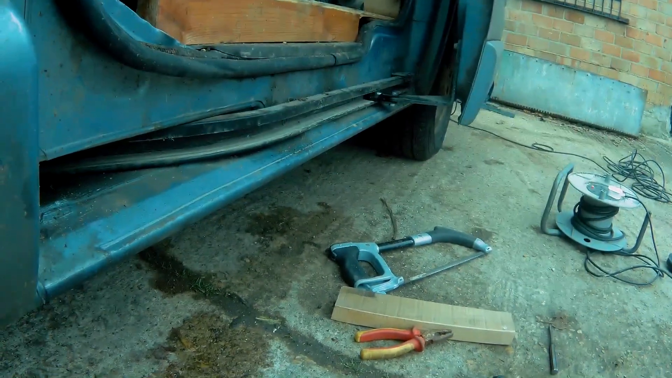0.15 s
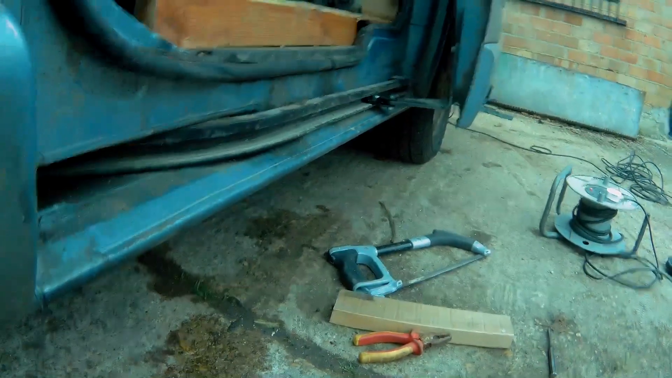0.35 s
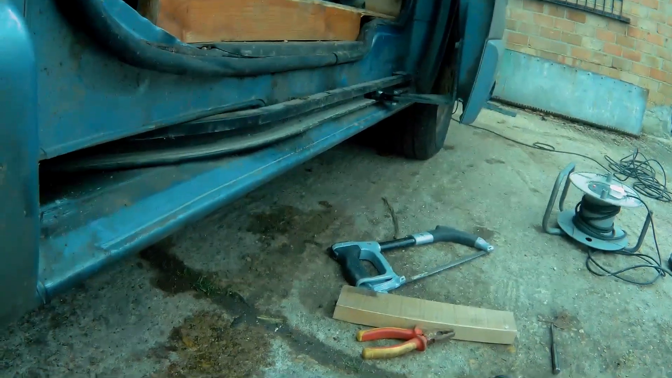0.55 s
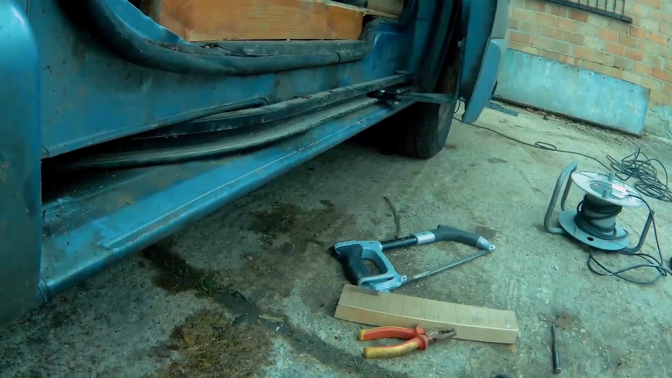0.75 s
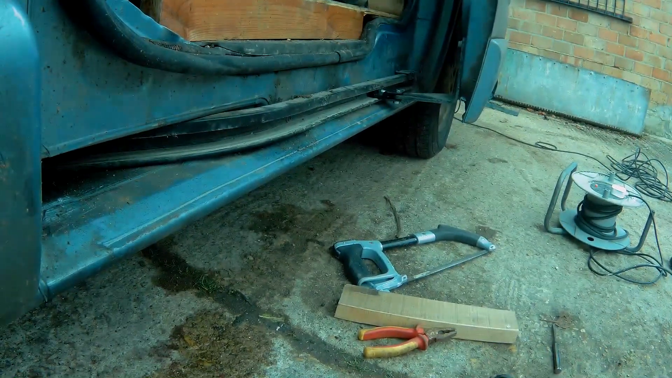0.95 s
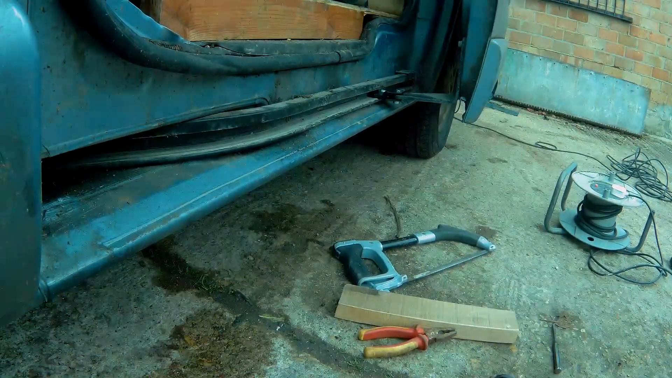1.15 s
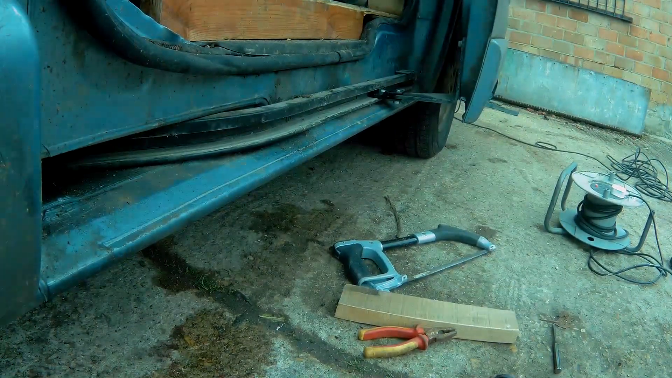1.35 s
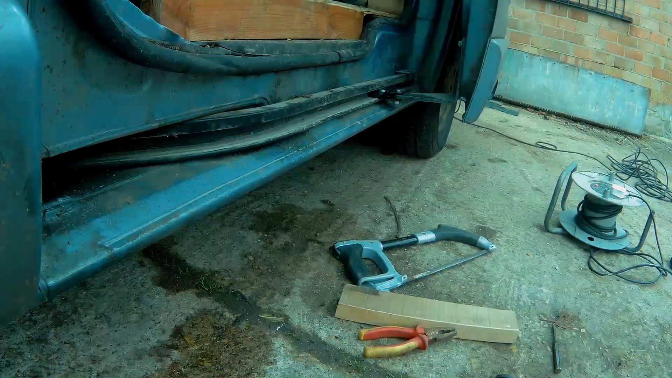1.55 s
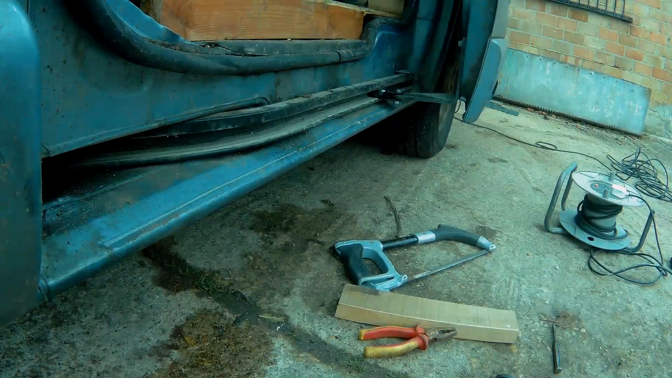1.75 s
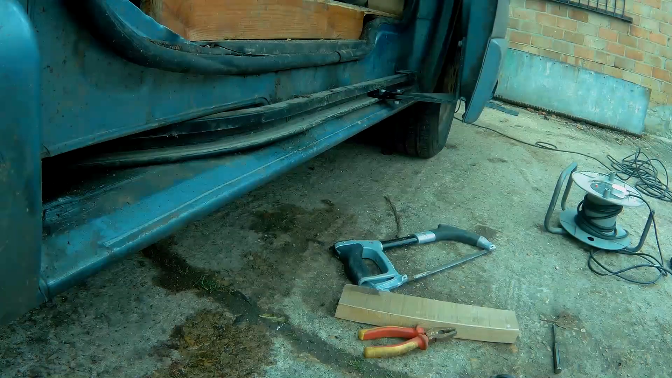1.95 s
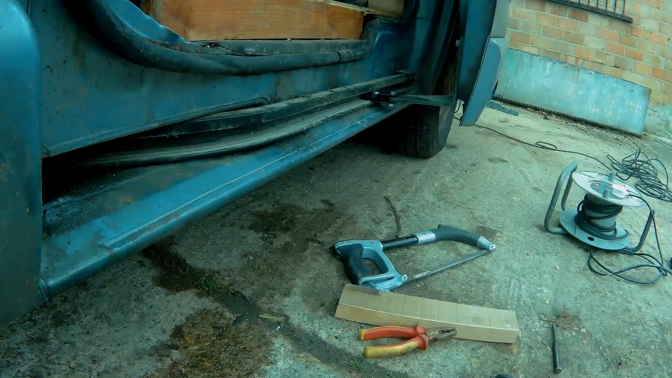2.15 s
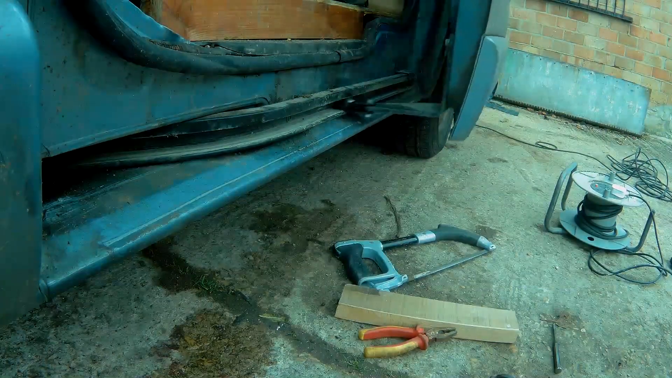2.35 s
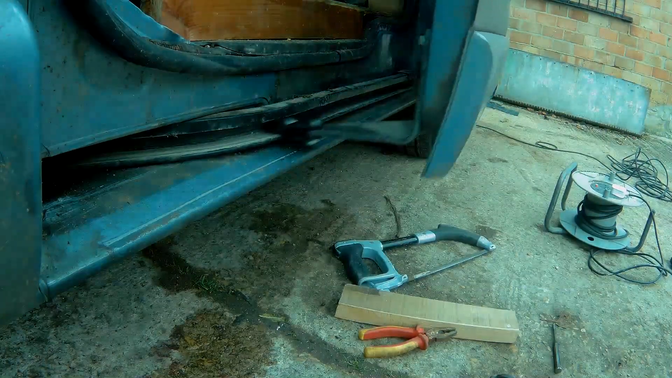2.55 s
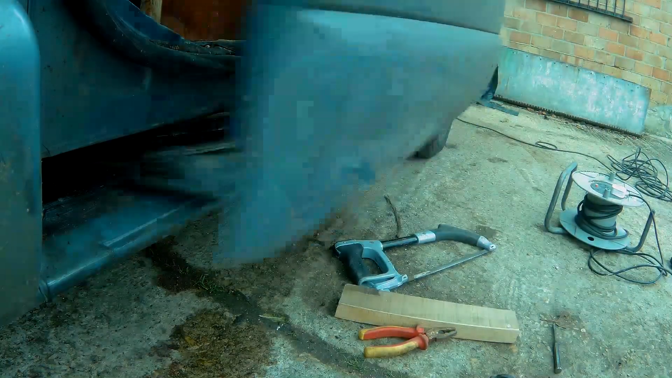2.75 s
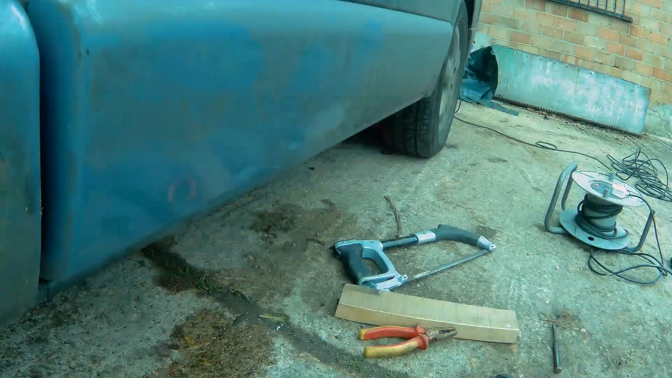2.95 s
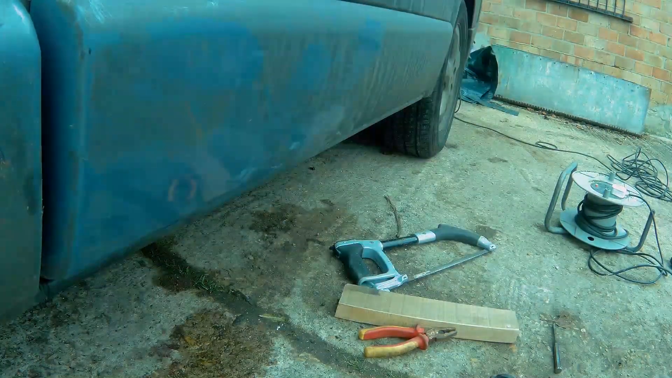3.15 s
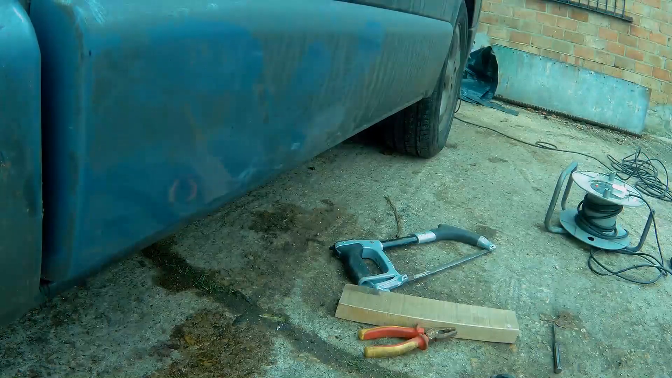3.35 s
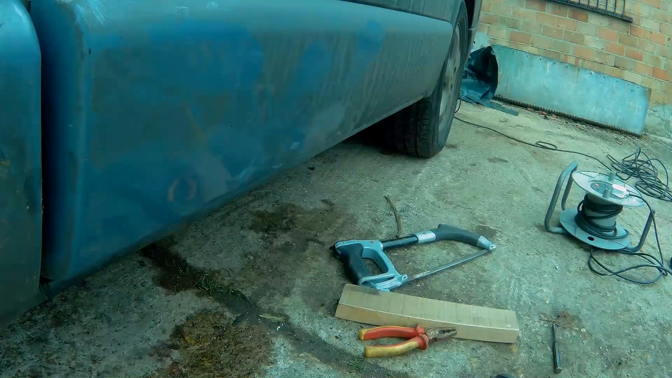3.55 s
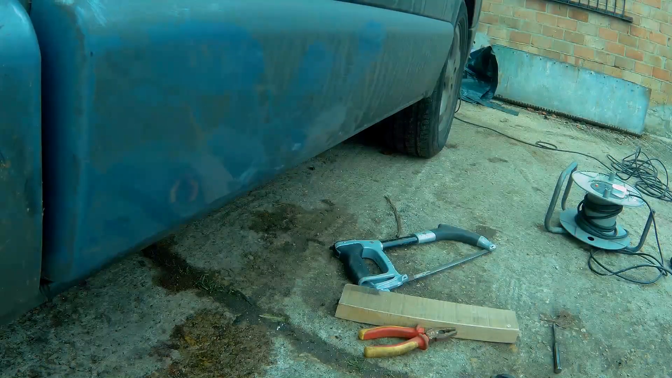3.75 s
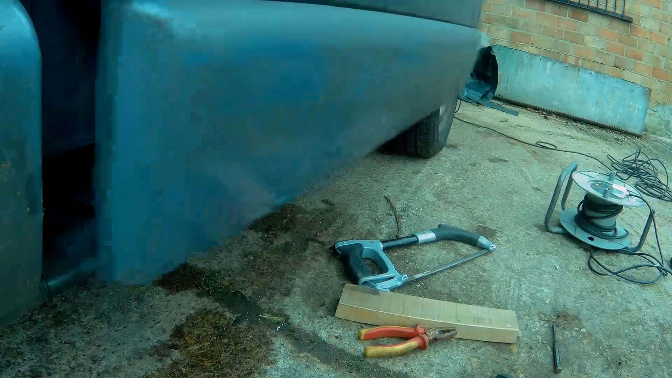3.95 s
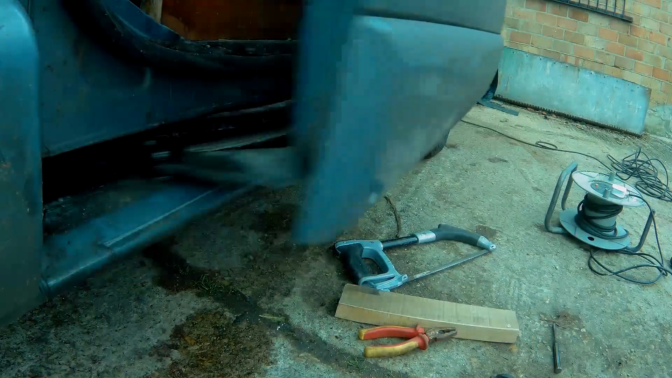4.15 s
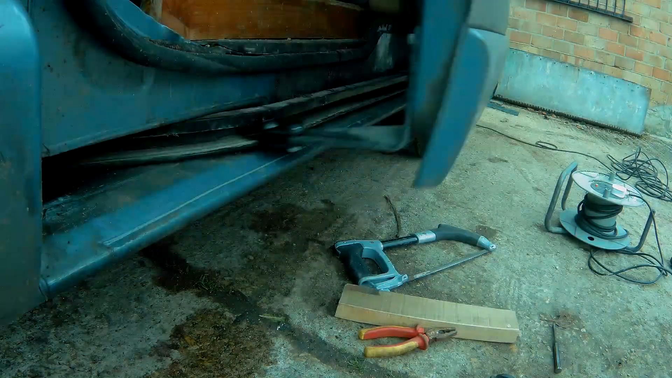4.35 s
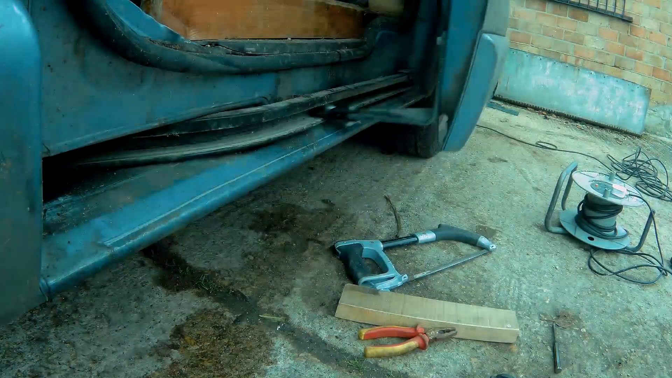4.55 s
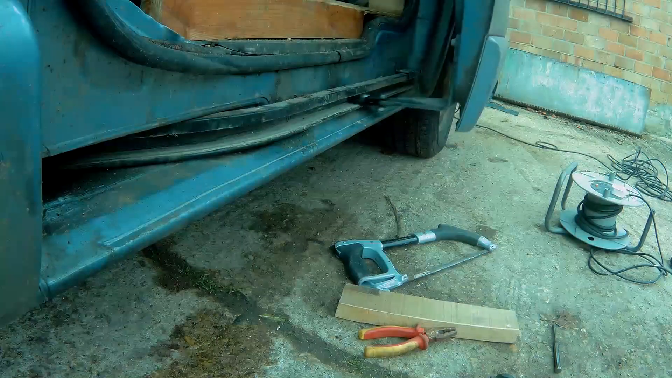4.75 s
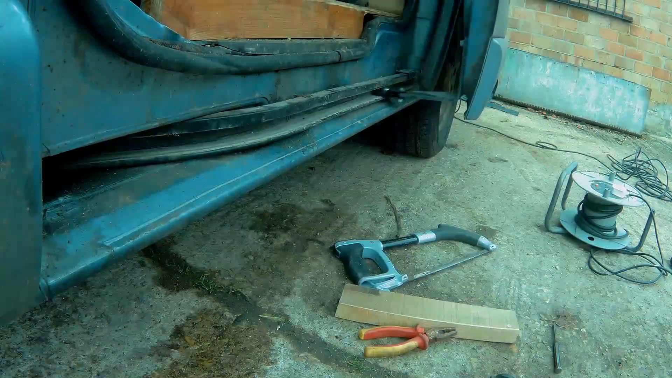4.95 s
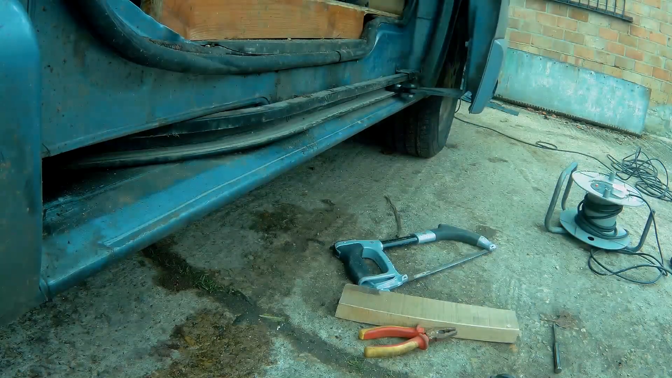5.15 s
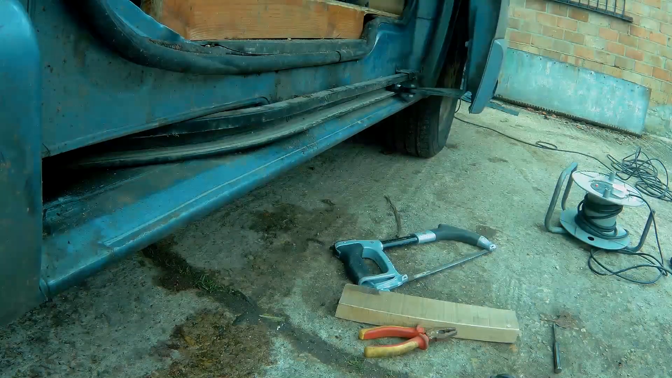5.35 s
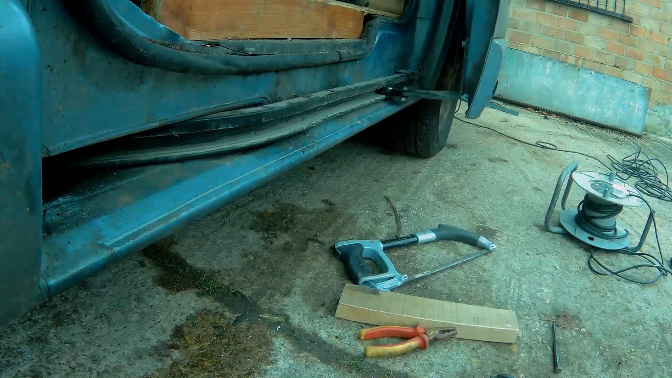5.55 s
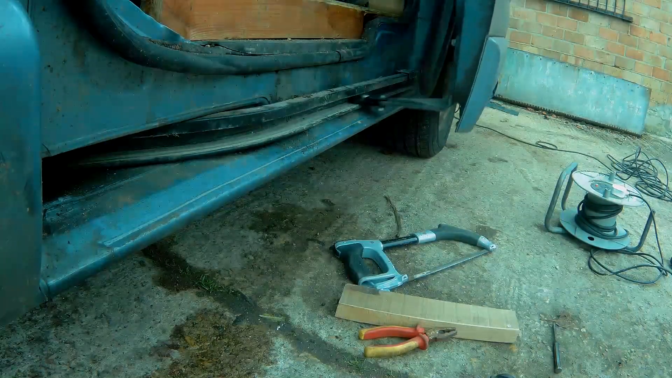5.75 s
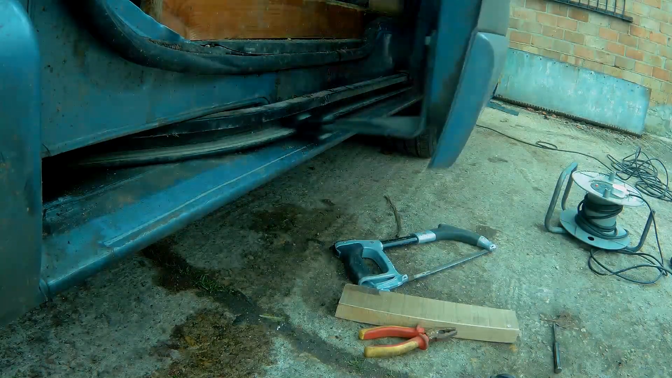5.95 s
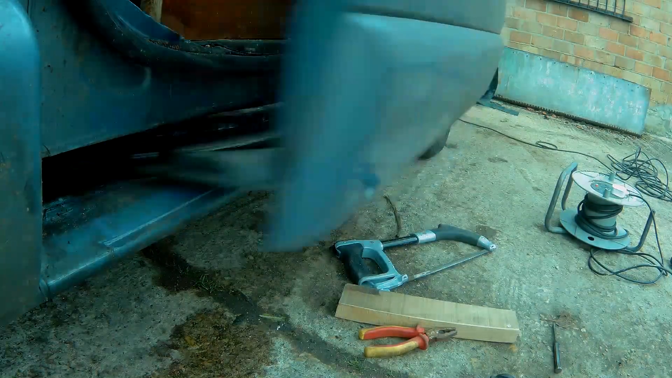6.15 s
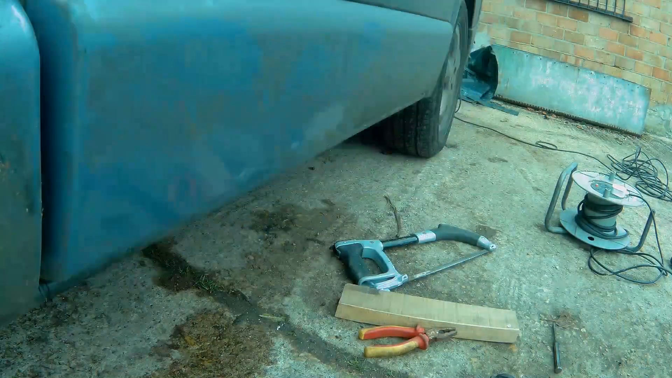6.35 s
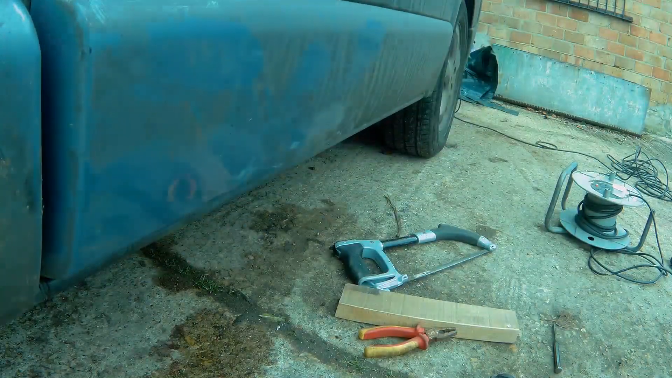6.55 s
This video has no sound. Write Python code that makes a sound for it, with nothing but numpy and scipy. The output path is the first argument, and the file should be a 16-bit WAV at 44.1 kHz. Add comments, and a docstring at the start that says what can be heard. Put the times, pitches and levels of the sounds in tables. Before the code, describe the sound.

A van's sliding door rumbles along its track and slams, is unlatched, slides open and slams again, over faint distant traffic.

```python
"""A van's sliding door in a yard, over the hum of far traffic. First shoes scuff, crunch and squeak on grit.
From 1.9 s the door rolls shut: rollers hiss, the door rasps and jolts, shaking the panels. At 2.9 s it slams,
ringing the hollow body and rocking it on its springs. At 3.7 s the latch is pulled; the door rolls back over
its detent, stops at 5.3 s, rolls shut and slams again at 6.3 s. The loudest blows overload."""
import sys
import numpy as np
from scipy import signal
from scipy.io import wavfile

SR = 44100
rng = np.random.default_rng(int(sys.argv[2]) if len(sys.argv) > 2 else 0)


def materialize(psi):
    """Save the field psi as 16-bit PCM at rate SR to the path in sys.argv[1].

    A 1-D psi becomes a single channel; in a 2-D psi each row is a channel.
    """
    bounded = np.clip(np.atleast_2d(psi).T, -1, 1)
    quanta = np.round(bounded * 32767).astype(np.int16)
    wavfile.write(sys.argv[1], SR, quanta)


N = 290914
SHOE_N = 2 * SR
HOP = 8   # samples per envelope value


def amp(db):
    """dB to gain."""
    return 10 ** (np.asarray(db) / 20)


def at_hz(table, hz):
    """Table value on a log-frequency axis."""
    table_hz, values = np.transpose(table)
    return np.interp(np.log(hz), np.log(table_hz), values)


def power_curves(table):
    """dB columns as power over time, silent outside the table."""
    times_s, *columns = np.transpose(table)
    return np.array([amp(2 * np.interp(np.arange(N) / SR, times_s, db, -120, -120)) for db in columns])


def drift(rate_hz):
    """Slow noise, unit spread."""
    r = np.exp(-80 * np.pi * rate_hz / SR)
    slow = signal.lfilter([1], [1, -2 * r, r * r], rng.standard_normal(N // 40 + 2002))[2000:]
    return np.interp(np.arange(N) / 40, np.arange(len(slow)), slow / slow.std())


def fade(power, t60_s, rate_hz=SR):
    """Exponential tail on a power curve, unit steady gain."""
    r = amp(-120 / (t60_s * rate_hz))
    return signal.lfilter([1 - r], [1, -r], power + 1e-18)


def bumps(per_s, spread_db, t60_s):
    """Power of random small impacts, mean 1."""
    hits = (rng.random(N) < per_s / SR) * amp(2 * spread_db * np.minimum(rng.exponential(1, N), 3))
    power = fade(fade(hits, t60_s), t60_s / 2)
    return power / power.mean()


def resonance(x, hz, width_hz):
    """Two-pole band-pass, unit peak gain."""
    r = np.exp(-np.pi * width_hz / SR)
    gain = (1 - r * r) / 2
    return signal.lfilter([gain, 0, -gain], [1, -2 * r * np.cos(2 * np.pi * hz / SR), r * r], x)


def bandpass(x, low_hz, high_hz):
    """Butterworth band-pass."""
    return signal.sosfilt(signal.butter(2, [low_hz, high_hz], "band", fs=SR, output="sos"), x)


def noise_bands(spectrum, size=N):
    """Third-octave noise shaped by a spectrum: centres, signals."""
    edges_hz = 25 * 2 ** (np.arange(29) / 3)
    centres_hz = np.sqrt(edges_hz[1:] * edges_hz[:-1])
    white = rng.standard_normal((2, size))
    return centres_hz, [amp(at_hz(spectrum, hz)) * bandpass(white[k % 2], *edges_hz[k:k + 2])
                        for k, hz in enumerate(centres_hz)]


# f/Hz, relative density/dB
TRAFFIC_SPECTRUM = [(15, -36), (25, -6.5), (98, -6), (193, -9.5), (259, -14.5), (494, -15), (682, -14),
                    (968, -13), (1080, -13.5), (1900, -22.5), (2990, -41.5), (4130, -32.5), (6710, -44.5),
                    (11800, -41.5), (15400, -55)]


def traffic(level_db=-45):
    """Far roar, each band wavering gently."""
    _, bands = noise_bands(TRAFFIC_SPECTRUM)
    roar = sum(band * amp(1.2 * drift(4)) for band in bands)
    return amp(level_db) * roar / roar.std()


# f/Hz, relative density/dB
SCUFF_SPECTRUM = [(150, -17), (250, 4.5), (569, -6), (761, -3.5), (1340, -7), (1650, -5.5), (2360, -16),
                  (4680, -20.5), (8820, -35), (10600, -22), (15000, -46)]
# t/s, drag/dB, rustle/dB
SCUFF_LEVELS = [(0.0, -47.5, -49.5), (0.254, -40, -68), (0.522, -42, -55.5), (0.742, -39.5, -53),
                (0.872, -49.5, -51), (1.026, -49, -95), (1.278, -62, -54), (1.5, -66, -80)]


def scuff():
    """A shoe drags over grit; the rough noise rings the sole."""
    _, bands = noise_bands(SCUFF_SPECTRUM, SHOE_N)
    low, high = sum(bands[:20]), sum(bands[20:])   # split at 2.5 kHz
    low = low + resonance(low, 1640, 150) + amp(3) * resonance(low, 810, 100)
    rough = 0.7 + 0.3 * np.minimum(bumps(per_s=150, spread_db=2.5, t60_s=0.03), 5)
    drag, rustle = np.sqrt(power_curves(SCUFF_LEVELS) * rough)[:, :SHOE_N]
    out = drag * low / low.std() + rustle * high / high.std()
    return np.pad(amp(-4) * out, (0, N - SHOE_N))


# t/s, level/dB
STONE_SNAPS = [(0.011, -30), (0.187, -33), (0.255, -17.5), (0.268, -23), (0.272, -30), (0.291, -28),
               (0.303, -30), (0.32, -15), (0.345, -26), (0.391, -17), (0.427, -38), (0.444, -28),
               (0.605, -14), (0.719, -27), (0.739, -22.5), (0.75, -30), (0.816, -34)]
# t/s, level/dB, rustle/dB, swell/ms
GRIT_CRUNCHES = [(0.001, -25.5, -34, 2.4), (0.05, -29.5, -36.5, 4.5), (0.131, -46, -66, 2.5),
                 (0.178, -27, -44, 1.8), (0.199, -30, -40, 3.2), (0.24, -29, -42, 2.8),
                 (0.303, -15, -31, 1.95), (0.411, -26, -46, 2.9), (0.531, -45, -38.5, 16),
                 (0.579, -32, -39, 11), (0.619, -15.5, -26, 4.2), (0.632, -15, -25, 1.3),
                 (0.665, -10, -25.5, 2.9), (0.779, -34, -34, 6.1), (0.849, -37, -42, 3.8),
                 (0.904, -49, -40, 3), (1.062, -44, -38.5, 2.9), (1.244, -42, -44, 3.2),
                 (1.286, -42, -41, 6), (1.397, -41, -39.5, 3.1)]
# f/Hz, width/Hz, gain/dB
SOLE_MODES = [(326, 140, -13.5), (752, 117, 0.5), (1110, 110, -8), (1590, 230, -2.5), (1910, 110, -6),
              (2470, 370, -11)]


def grit(snap_t60_ms=17):
    """Stones snap as single pushes, grit crunches in swells of noise; both ring the sole."""
    push, bright, crunch = np.zeros((3, SHOE_N)) + 1e-18
    n = SR // 20
    t_ms = np.arange(n) / SR * 1000
    for start_s, level_db in STONE_SNAPS:
        i = round(start_s * SR)
        push[i] -= amp(level_db + 13)
        bright_db = level_db - 7 + 0.31 * (level_db + 15)   # weak snaps are duller
        bright[i:i + n] += amp(bright_db - 60 * t_ms / snap_t60_ms) * rng.standard_normal(n)
    for start_s, level_db, rustle_db, swell_ms in GRIT_CRUNCHES:
        i = round(start_s * SR)
        age = t_ms / swell_ms
        bursts = (age * np.exp(1 - age)) ** 2 * rng.standard_normal((2, n))
        crunch[i:i + n] += amp(level_db + 14) * bursts[0]
        bright[i:i + n] += amp(rustle_db) * bursts[1]
    sole = sum(amp(gain_db) * resonance(resonance(crunch, hz, 2 * width_hz) + amp(16.5) * push, hz, width_hz)
               for hz, width_hz, gain_db in SOLE_MODES)
    out = bandpass(push + sole, 280, 2180) + bandpass(bandpass(bright, 2450, 4970), 2500, 13000)
    out -= 0.89 * resonance(out, 3380, 380)   # notch
    return np.pad(out, (0, N - SHOE_N))


# t/s, length/s, start f/Hz, end f/Hz, level/dB
SQUEAK_GLIDES = [(0.53, 0.087, 1620, 1760, -41.5), (0.357, 0.063, 1750, 1660, -42),
                 (3.785, 0.03, 2960, 2770, -28), (3.787, 0.028, 6100, 5030, -32),
                 (3.808, 0.02, 4200, 4030, -21.5), (4.079, 0.027, 1568, 1610, -23),
                 (4.267, 0.049, 1730, 1750, -28), (5.878, 0.049, 2200, 2200, -24.5)]


def squeaks():
    """Dry friction at sole, latch and rollers: short glides, roughened by uneven slip."""
    out = np.zeros(N)
    for start_s, length_s, from_hz, to_hz, level_db in SQUEAK_GLIDES:
        i, n = round(start_s * SR), round(length_s * SR)
        phase = 2 * np.pi * np.cumsum(np.linspace(from_hz, to_hz, n)) / SR
        out[i:i + n] += amp(level_db) * np.hanning(n) * np.sin(phase)
    return out * amp(5 * drift(160))


# per slide (shut, open, shut): t/s, panel rumble/dB, roller hiss/dB, body boom/dB
SLIDES = [
    [(1.9, -48, -72, -61), (1.984, -37.5, -55, -53), (2.06, -48.5, -72, -43), (2.178, -32.5, -54, -31.5),
     (2.462, -13, -37, -25), (2.566, -17.5, -40, -24), (2.626, -13, -35.5, -21), (2.676, -16.5, -40.5, -33),
     (2.784, -12, -37, -39), (2.88, -19, -38, -19)],
    [(3.84, -29, -49, -20), (3.94, -34, -50, -38), (4.062, -23.5, -38.5, -20), (4.112, -23, -41.5, -30),
     (4.562, -23, -45, -32), (4.608, -16.5, -30.5, -16.5), (4.68, -23, -42, -29.5), (5.104, -28, -47, -28),
     (5.14, -31, -45, -42), (5.3, -64, -70, -43)],
    [(5.32, -49, -65, -39), (5.398, -44.5, -81, -53), (5.538, -33, -54, -25), (5.616, -24.5, -50, -30.5),
     (5.912, -11.5, -36.5, -28.5), (6.046, -14, -34.5, -31), (6.06, -14.5, -33, -21),
     (6.128, -18, -38.5, -27), (6.16, -12.5, -38.5, -34), (6.325, -19, -45, -25)],
]


def rolling():
    """Rollers cross dents and dirt: power in six zones (thump, boom, panel, frame, grit, sizzle)."""
    rumble, hiss, boom = sum(power_curves(slide) for slide in SLIDES)
    dents = 0.5 + 0.5 * bumps(per_s=62, spread_db=5, t60_s=0.45)
    dirt = 0.34 + 0.043 * bumps(per_s=91, spread_db=4.5, t60_s=0.05)
    sizzle = hiss * (hiss / amp(2 * -45)) ** 0.28   # louder hiss is brighter
    zones = np.array([boom, boom * dents, rumble * dents, rumble * dents, hiss * dirt, sizzle * dirt])
    gains_db = np.array([-31, -1, -2.5, -6.5, -0.5, -11])
    return amp(2 * gains_db[:, None]) * zones[:, ::HOP]


def roller_pings(per_s=70):
    """Grains under the rollers ring small metal parts, each at its own pitch."""
    hiss = np.sqrt(sum(power_curves(slide)[1] for slide in SLIDES))
    grains = amp(4 * np.minimum(rng.exponential(1, N), 3)) * (rng.random(N) < per_s / SR)
    part = rng.integers(0, 12, N)
    return amp(24.5) * sum(resonance(hiss * grains * (part == k) + 1e-18, hz, hz / 50)
                           for k, hz in enumerate(np.geomspace(3500, 7500, 12)))


# per zone: extra rise/s
ZONE_RISE_S = [0.00082, 0, .001, 0.0011, 0.00062, 0.0029]
# per zone: t60 factor
ZONE_T60_SCALE = [4.3, 1.57, 1.65, 1.46, 0.84, 0.72]


def add_shake(zones, start_s, levels_db, base_rise_s, base_t60_s):
    """One shake of the door: each zone swells, then dies, the lows last."""
    i = round((start_s - 0.78 * base_rise_s) * SR / HOP)
    t = np.arange(min(zones.shape[1] - i, SR // 16)) * HOP / SR
    rise_s = base_rise_s + np.array(ZONE_RISE_S)[:, None]
    t60_s = base_t60_s * np.array(ZONE_T60_SCALE)[:, None]
    swell = (1 - np.exp(-t / rise_s)) ** 2
    zones[:, i:i + len(t)] += swell * amp(2 * (levels_db[:, None] - 60 * t / t60_s))


# t/s, rasp/dB, jolt/dB, extra sizzle/dB
DOOR_RUBS = [(1.9746, -33.5, -27, 0), (2.1286, -51, -29, 3), (2.1894, -30.5, -20.5, 8),
             (2.257, -40, -15.5, 0), (2.362, -26.5, -35, -7), (2.4353, -17.5, -4.5, 2),
             (2.4877, -24, -31, 9), (2.6179, -18, -5, 4), (2.6434, -23, -25, 2), (2.7784, -30, -20, 2),
             (2.808, -18, -28, 4), (2.825, -16.5, -3, 4), (3.5109, -41, -40, 1), (3.8626, -30, -9, 0),
             (3.8845, -26, -15, 7), (3.9756, -20, -16.5, -2), (4.0193, -27, -27, 0),
             (4.0457, -18.5, -12, 1), (4.0914, -22, -11.5, 5), (4.141, -23, -20, 2),
             (4.261, -26, -15, -2), (4.2884, -23, -15, -2), (4.387, -30.5, -29, 2),
             (4.4832, -29, -21, 6), (4.5775, -25.5, -18, 3), (4.7202, -25, -31, -12),
             (4.8085, -29, -13, -5), (4.8763, -24.5, -12.5, -15), (4.9127, -29, -21, -6),
             (4.968, -22, -14, -9), (5.028, -31, -11.5, -1), (5.0973, -30, -29, -12),
             (5.62, -31, -34, -8), (5.7892, -27, -13, 2), (5.8695, -17, -13, 0), (5.894, -21, -1, 0),
             (6.0596, -14, -9, -2), (6.2093, -28, -9, 3), (6.238, -19, -22, 1),
             (6.483, -24.5, -5.5, 2)]


def add_rubs(zones):
    """The door rasps and jolts on rough spots, or rubs lightly when the handle is touched: low zones follow the
    jolt, high ones the rasp."""
    gains_db = np.array([-32, -12, -6.5, -2.5, -3.5, -11.5])
    for start_s, rasp_db, jolt_db, sizzle_db in DOOR_RUBS:
        frame_db = jolt_db + 0.18 * (rasp_db - jolt_db)
        levels_db = gains_db + [jolt_db, jolt_db, jolt_db, frame_db, rasp_db, rasp_db + sizzle_db]
        add_shake(zones, start_s, levels_db, base_rise_s=0.0058, base_t60_s=0.07)


# t/s, strength/dB, extra weight/dB, extra bite/dB, base t60/s
DOOR_BLOWS = [(2.8848, -5, 4.5, -3.5, 0.24), (2.921, -10, 10, 8, 0.075), (2.946, -10.5, 1, -4, 0.14),
              (2.9857, -9, 3, -5, .12), (3.016, -16.5, 1, -7.5, 0.14), (3.683, -39, -14, -3, 0.27),
              (3.732, -30.5, -1, 15.5, 0.051), (3.755, -16.5, 11, 5.5, 0.13), (3.802, -10, 2.5, -6, 0.082),
              (3.8275, -15, -10, 3, 0.043), (4.601, -21.5, -4, 0, 0.25), (5.31, -34, 15, -5, 0.053),
              (6.3279, -9, -3, -19, 0.29), (6.3373, -6.5, -6, 7.5, .13), (6.3700, -6.5, 5, 7, .09),
              (6.391, -12.5, -1, 4, 0.13), (6.421, -13.5, 2, -11, 0.17), (6.5246, -15.5, -3, -14, 0.054)]


def blows():
    """Slam and latch blows as (t/s, zone levels/dB, base t60/s); harder ones reach lower and higher."""
    for start_s, strength_db, weight_db, bite_db, t60_s in DOOR_BLOWS:
        levels_db = (strength_db + np.array([-12.5, -9, 1, 2.03, -15, -21])
                     + (strength_db + 8.5) * np.array([0.16, 0.1, 0.07, 0.14, 0, 0.72])
                     + weight_db * np.array([0.85, 1.15, 0.11, -0.19, 0, 0])
                     + bite_db * np.array([0, 0, 0, 0.08, 0.85, 1]))
        yield start_s, levels_db, t60_s


def blow_pushes(zone, gain_db):
    """First contact of each blow: one impulse, scaled by a zone's level."""
    push = np.zeros(N) + 1e-18
    for start_s, levels_db, _ in blows():
        push[round(start_s * SR)] += amp(levels_db[zone] + gain_db)
    return push


# f/Hz, relative density/dB
DOOR_SPECTRUM = [(15, -35), (25, -5.5), (75, -5), (119, 0.5), (204, 1), (246, 0), (368, -0.5), (409, -1.5),
                 (550, -5), (1570, -15.5), (3070, -32.5), (4250, -26.5), (9510, -38), (12800, -36.5),
                 (15400, -77)]
# f/Hz
ZONE_EDGES_HZ = [25, 90, 200, 700, 2500, 7000, 16500]
# f/Hz, zone index
ZONE_BLEND = [(70, 0), (110, 1), (150, 1), (250, 2), (500, 2), (900, 3), (1900, 3), (3300, 4), (5500, 4),
              (9000, 5)]
# f/Hz, t60/s
BODY_T60 = [(30, 1.0), (120, 1), (340, 0.72), (960, 0.61), (2700, 0.23), (10000, 0.39)]
# f/Hz, width/Hz, gain/dB
DOOR_MODES = [(126.7, 20, -1), (194.5, 3.3, -21), (267.5, 25, -6), (335.6, 30, -4), (402.6, 14, -3),
              (452.4, 39, 2), (617, 20, -6.5), (700, 16, -0.5), (778, 60, -17), (1025, 104, -7.5),
              (1196, 14, -16), (1453, 11.6, 4), (1730, 110, -4), (2200, 15, 4), (4200, 620, 5.5),
              (4836, 24, 6.5), (5690, 97, 4.5), (6860, 22, -19), (7110, 170, 4), (8500, 53, 5),
              (10600, 140, 3)]


def door():
    """Rolling, scrapes and blows drive bands of noise; the hollow body and the panels ring on."""
    zones = rolling()
    add_rubs(zones)
    for start_s, levels_db, t60_s in blows():
        add_shake(zones, start_s, levels_db, base_rise_s=0.00064, base_t60_s=t60_s)
    centres_hz, bands = noise_bands(DOOR_SPECTRUM)
    band_zone = np.searchsorted(ZONE_EDGES_HZ, centres_hz) - 1
    noise_power = np.bincount(band_zone, weights=[np.mean(band ** 2) for band in bands])
    drive = zones / noise_power[:, None] + 1e-18
    out = np.zeros(N)
    for hz, band in zip(centres_hz, bands):
        place = np.interp(hz, *np.transpose(ZONE_BLEND))
        k = min(int(place), 4)
        power = drive[k] ** (k + 1 - place) * drive[k + 1] ** (place - k)   # blend adjacent zones
        power += amp(-19.5) * fade(power, at_hz(BODY_T60, hz), SR / HOP)
        out += band * np.repeat(np.sqrt(power), HOP)[:N] * amp(2.35 * drift(33))
    contact = -blow_pushes(zone=3, gain_db=25)
    out += bandpass(bandpass(contact, 380, 1800), 200, 2700)
    panels = sum(amp(gain_db) * resonance(out, hz, width_hz) for hz, width_hz, gain_db in DOOR_MODES)
    return amp(-2.5) * (out + panels)


def body_rock():
    """Blows rock the van on its springs: a low swing that dies fast."""
    return resonance(blow_pushes(zone=0, gain_db=40.5), hz=33, width_hz=9)


def scene():
    """All sources, mono."""
    return (door() + roller_pings() + body_rock() + squeaks() + grit() + scuff() + traffic())[None]


def record(dry):
    """Soft clip, then a steep low-pass."""
    ceiling, cutoff_hz = 0.95, 15900
    clipped = dry / (1 + np.abs(dry / ceiling) ** 6) ** (1 / 6)
    return signal.sosfilt(signal.cheby2(20, 60, cutoff_hz, fs=SR, output="sos"), clipped)


dry = scene()
out = record(dry)
materialize(out)
```